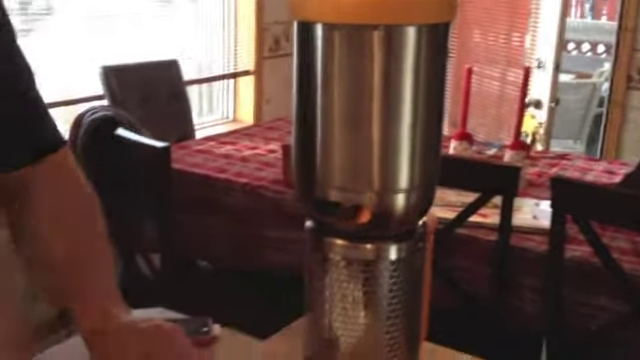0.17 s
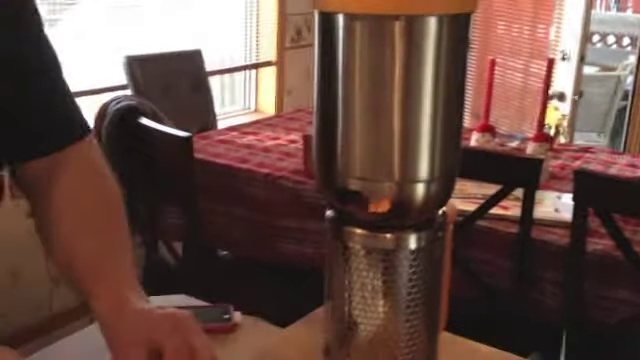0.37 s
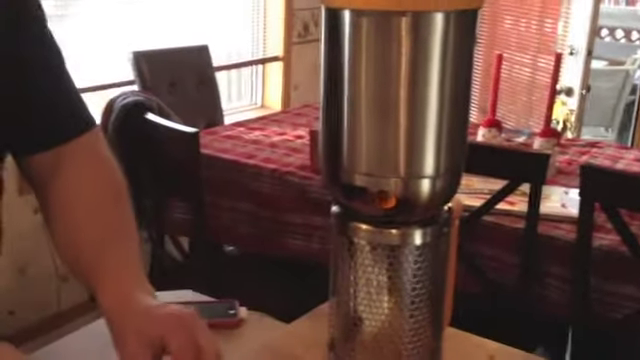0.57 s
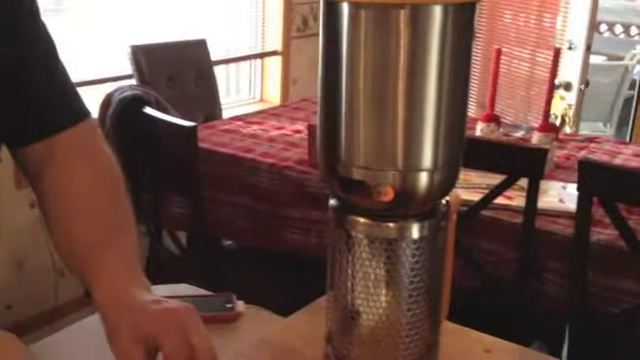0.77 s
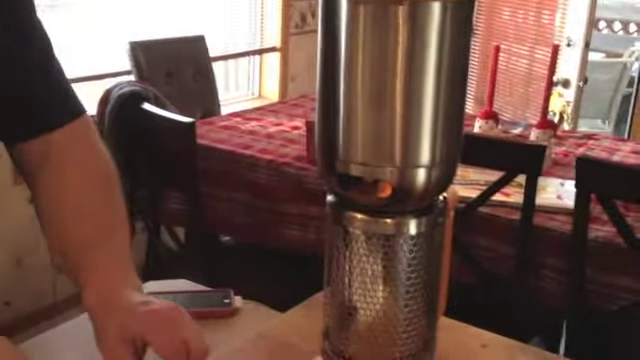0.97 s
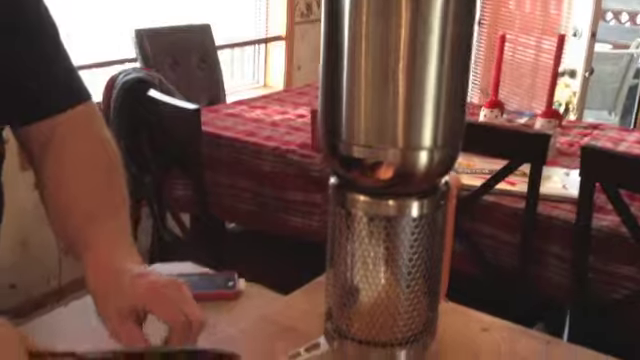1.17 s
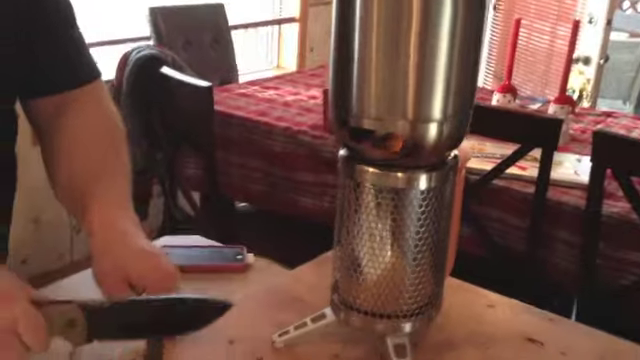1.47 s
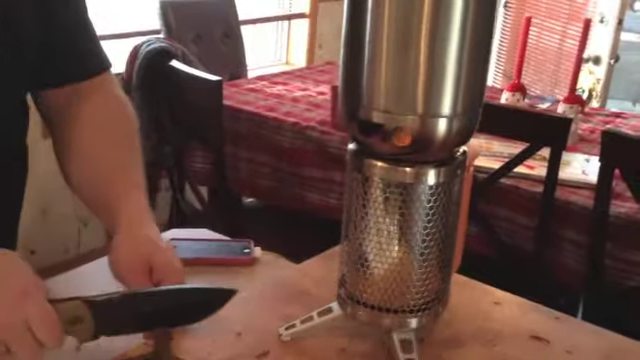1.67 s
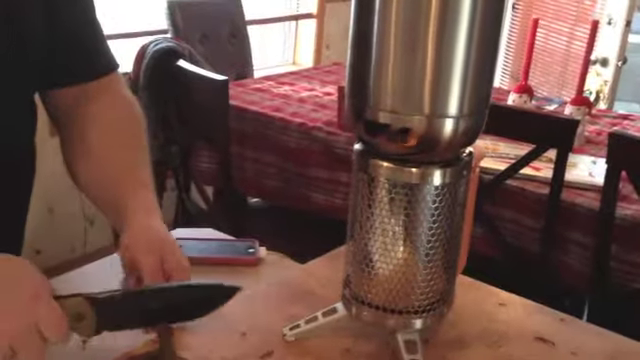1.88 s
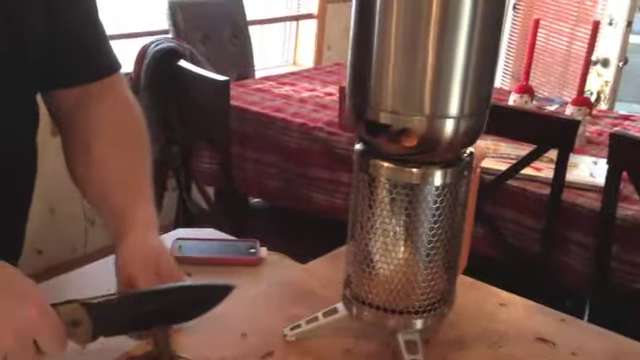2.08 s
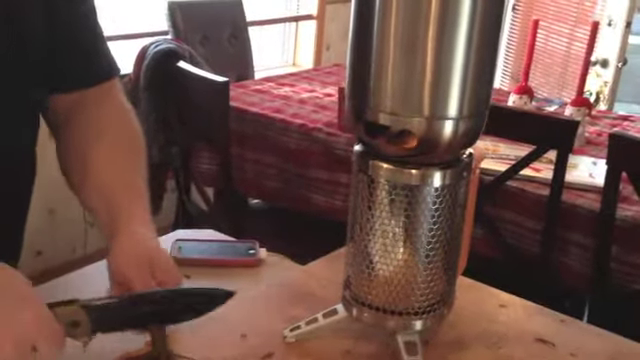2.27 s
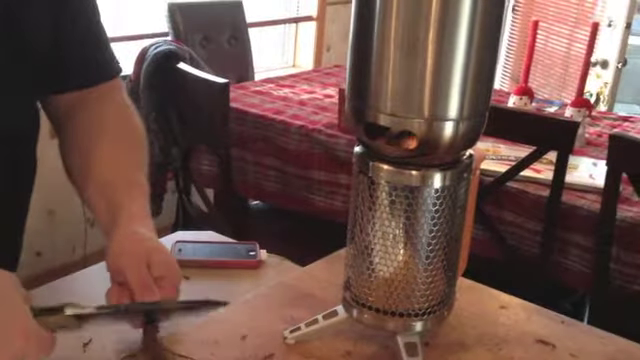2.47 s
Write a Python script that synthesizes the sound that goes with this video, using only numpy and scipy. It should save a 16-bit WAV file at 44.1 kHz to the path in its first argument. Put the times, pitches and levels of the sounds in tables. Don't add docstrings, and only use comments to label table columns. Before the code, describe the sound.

A hard knock strikes a wooden table almost at once, bounces faintly and rings through a small room; a stove fan whirs softly throughout, with faint knife ticks later, heard by a close, slightly overloaded microphone.

```python
import sys
import numpy as np
from scipy import signal
from scipy.io import wavfile
from scipy.ndimage import uniform_filter1d

SR = 44100
rng = np.random.default_rng(int(sys.argv[2]) if len(sys.argv) > 2 else 0)


def transcribe(u):
    v = np.clip(np.atleast_2d(u).T, -1, 1)
    q = np.round(v * 32767).astype(np.int16)
    wavfile.write(sys.argv[1], SR, q)


def invert_db(x):
    u = np.asarray(x, float) / 20
    return 10 ** u


N = 114660

# pitch_hz, level_db (per Hz)
FAN_AIR = [(41, -61), (70, -12.5), (173, -6.5), (500, -4), (547, -3.5), (751, -4.5), (1050, -11),
           (2980, -19.5), (15500, -50)]
# pitch_hz, width_hz, lift_db
HOLLOWS = [(171, 27, 4.5), (263.5, 6.9, 1.5), (352, 39, -10), (455.3, 4, 10), (492.8, 11.2, 4.5),
           (608, 6, -2), (713, 17, -3.5), (770.4, 6.7, 6.5), (1197, 9.8, -7), (1439, 11, -13),
           (1708, 10, 3.5), (4450, 450, -7.5)]
# multiple (of the drive rate), before_db, after_db (around the drive change)
MOTOR_WHINE = [(2, -62, -70), (3, -79, -76), (4, -77, -86)]
# centre_s, half_width_s, level_db
RUSTLES = [
    (0.559, .015, -80),
    (1.345, .03, -70),
    (1.92, .04, -81),
    (2.09, .02, -79),
    (2.505, .03, -67),
]
# start_s, peak_db, pitch_hz,
# scuff_db, thump_db
TICKS = [(0.228, -99, 4000, -99, -36), (0.561, -58, 8500, -55, -74), (1.079, -60, 11500, -80, -90),
         (0.3068, -28.5, 8900, -70, -40), (1.566, -49, 8400, -92, -66), (1.905, -49, 4300, -62, -85),
         (1.934, -52, 4620, -72, -85), (2.088, -57, 7000, -76, -95), (2.489, -60, 9000, -66, -90),
         (2.5002, -53, 7500, -63, -85), (2.5091, -30, 4500, -46.5, -70), (2.522, -51, 4600, -79, -90),
         (2.594, -70, 4000, -85, -54)]
# pitch_hz, level_db (per Hz)
ROOM_TAIL = [(24, -66), (40, -28), (136, 2), (472, -0.5), (797, -3.5), (1160, -8.5), (1380, -9.5),
             (6320, -27), (15500, -61)]
# pitch_hz, t60_s
ROOM_T60 = [(60, 0.14), (160, 0.65), (420, 0.43), (1100, 0.43), (2910, 0.37), (7680, 0.33)]
# start_s, crack_db, table_db
KNOCKS = [
    (0.2250, -2.5, -7),
    (0.3068, -36, -28.5),
]
# pitch_hz, level_db, t60_s
HARD_EDGE = [(2200, -2, .006), (3300, -5, .004), (4600, -3, .004), (7200, -17, .004), (9000, -18, .004),
             (13300, -24, .005)]
# pitch_hz, level_db, t60_s
WOODEN_TOP = [(165.3, -6, 0.37), (201.7, -4, .25), (258.8, -10, 0.46), (292.1, -5, .3), (359, -6.5, .25),
              (435, -2.5, 0.31), (482.5, 0.5, 0.25), (590, -14, 0.36), (747, -13, 0.2), (813, -6.5, 0.19),
              (1024, -12, 0.26), (1199, -8.5, 0.31), (1536, -16.5, 0.28), (2055, -8, 0.14)]
# pitch_hz, level_db, t60_s
THUD = [(136.4, -18.5, 0.18), (203, -5, 0.079), (273.6, -4.5, 0.13), (340, -22, 0.059)]

AIR_DB, AIR_PATCHY_DB, AIR_LOW_CUT_HZ = -43.5, 0.65, 177
DRIVE_HZ, DRIVE_CHANGE_S, WHINE_WOBBLE_DB = 961, 1.545, 2.5
RUSTLE_HZ, MIC_HISS_DB = 8000, -95
BLADE_CYCLES, BLADE_OVERTONE, SNAP_DB, SNAP_S = 22, 1.35, -9, 0.0017
SCUFF_RISE_S, SCUFF_T60_S, SCUFF_LOW_HZ, SCUFF_TOP_HZ = 0.0037, 0.16, 3430, 7000
THUMP_HZ, THUMP_T60_S = 41, 0.058
TAIL_DB, TAIL_RISE_S, TAIL_LOW_HZ = -6.5, 0.0022, 446
BUZZ_DB, BUZZ_S, BUZZ_FADE_S, BUZZ_HZ = -46, 0.13, 0.05, 8050
CRACK_S, CRACK_TOUCHES = 0.0012, 5
TOP_LAG_S, TOP_SPREAD_S, THUD_LAG_S = 0.00073, 0.00303, 0.0011
MIC_LOW_HZ, MIC_TOP_HZ, CLIP = 95, 15400, 0.67
GAIN_KNEE_DB, GAIN_RATIO, GAIN_ATTACK_S, GAIN_RELEASE_S = -35.5, 0.32, 0.026, 0.55


def rms_one(x):
    return x / np.sqrt(np.mean(x ** 2) + 1e-20)


def at_hz(points, hz):
    pitch_hz, value = np.transpose(points)
    return np.interp(np.log(hz), np.log(pitch_hz), value)


def drift(rate_hz):
    r = np.exp(-2 * np.pi * rate_hz * 40 / SR)
    slow = signal.lfilter([1], [1, -2 * r, r * r], rng.standard_normal(N // 40 + 2002))
    slow = rms_one(slow[2000:])
    return np.interp(np.arange(N) / 40, np.arange(len(slow)), slow)


def ring(clicks, hz, t60):
    r, w = invert_db(-60 / (t60 * SR)), 2 * np.pi * hz / SR
    return signal.lfilter([0, np.sin(w)], [1, -2 * r * np.cos(w), r * r], clicks + 1e-18)


def cut(x, hz, kind, order=2):
    return signal.sosfilt(signal.butter(order, hz, kind, fs=SR, output="sos"), x)


def bands():
    edges = 28 * 2 ** np.arange(0, 9.4, 1 / 3)
    white = rng.standard_normal((3, N))
    out = []
    for k, (low, high) in enumerate(zip(edges, edges[1:])):
        out.append((np.sqrt(low * high), cut(white[k % 3], [low, high], "band")))
    return out


def since(start_s):
    t = np.arange(N) / SR - start_s
    return np.maximum(t, 0), t >= 0


def click(start_s, db):
    x = np.zeros(N)
    x[int(start_s * SR)] = invert_db(db)
    return x


def mic_hiss():
    return invert_db(MIC_HISS_DB) * rng.standard_normal(N)


def fan_air():
    together = drift(3.1)
    air = np.zeros(N)
    for hz, band in bands():
        patchy_db = AIR_PATCHY_DB * (0.2 * together + drift(22.5))
        air += invert_db(at_hz(FAN_AIR, hz) + patchy_db) * band
    out = air.copy()
    for hz, width, lift_db in HOLLOWS:
        r = np.exp(-np.pi * width / SR)
        poles = [1, -2 * r * np.cos(2 * np.pi * hz / SR), r * r]
        out += invert_db(lift_db) * signal.lfilter([(1 - r * r) / 2, 0, (r * r - 1) / 2], poles, air)
    return invert_db(AIR_DB) * rms_one(cut(out, AIR_LOW_CUT_HZ, "high"))


def motor_whine():
    t = np.arange(N) / SR
    out = np.zeros(N)
    for multiple, before_db, after_db in MOTOR_WHINE:
        level_db = np.where(t < DRIVE_CHANGE_S, before_db, after_db) + WHINE_WOBBLE_DB * drift(2)
        level = invert_db(uniform_filter1d(level_db, size=200))
        out += level * np.sqrt(2) * np.sin(2 * np.pi * multiple * DRIVE_HZ * t)
    return out


def rustle():
    t = np.arange(N) / SR
    swell = sum(invert_db(db) * np.exp(-0.5 * ((t - s) / width) ** 2) for s, width, db in RUSTLES)
    grain = rms_one(cut(rng.standard_normal(N), RUSTLE_HZ, "high")) * invert_db(2.5 * drift(120))
    return swell * grain


def thumps():
    return sum(ring(click(s, thump_db), THUMP_HZ, THUMP_T60_S) for s, _, _, _, thump_db in TICKS)


def knife():
    hiss = cut(cut(rng.standard_normal(N), SCUFF_LOW_HZ, "high"), SCUFF_TOP_HZ, "low")
    hiss = rms_one(hiss) * invert_db(2.1 * drift(150))
    slips = cut(rng.standard_normal(N), 2800, "high")
    out = np.zeros(N)
    for s, db, hz, scuff_db, _ in TICKS:
        t, on = since(s)
        hit = click(s, db) + click(s + 1 / hz, db + 1.5)
        blade_t60 = BLADE_CYCLES / hz
        out += ring(hit, hz, blade_t60)
        out += 0.76 * ring(hit, min(BLADE_OVERTONE * hz, 14500), blade_t60)
        out += on * (t < SNAP_S) * invert_db(db + SNAP_DB) * slips
        out += (1 - np.exp(-t / SCUFF_RISE_S)) * invert_db(scuff_db - 60 * t / SCUFF_T60_S) * hiss
    return out


def room_tail():
    t, on = since(KNOCKS[0][0])
    parts = [(hz, invert_db(at_hz(ROOM_TAIL, hz)) * band) for hz, band in bands()]
    scale = np.sqrt(np.mean(sum(part for _, part in parts) ** 2))
    wash = sum(part * invert_db(-60 * t / at_hz(ROOM_T60, hz)) for hz, part in parts) / scale
    wash = cut(wash, TAIL_LOW_HZ, "high", order=1)
    buzz = rms_one(cut(rng.standard_normal(N), BUZZ_HZ, "high")) * invert_db(1.6 * drift(54))
    hold = invert_db(BUZZ_DB - 60 * t - 20 * np.maximum(t - BUZZ_S, 0) / BUZZ_FADE_S)
    return on * (1 - np.exp(-t / TAIL_RISE_S)) * (invert_db(TAIL_DB) * wash + hold * buzz)


def thud():
    out = np.zeros(N)
    for k, (hz, db, t60) in enumerate(THUD):
        out += (-1) ** k * ring(click(KNOCKS[0][0] + THUD_LAG_S, db), hz, t60)
    return out


def wooden_top(start_s, table_db):
    out = np.zeros(N)
    for hz, db, t60 in WOODEN_TOP:
        lag, sign = rng.random(2)
        hit = click(start_s + TOP_LAG_S + TOP_SPREAD_S * lag, table_db + db)
        out += ring(hit, hz, t60) * np.sign(sign - 0.5)
    return out


def crack(start_s, crack_db):
    out = np.zeros(N)
    for hz, db, t60 in HARD_EDGE:
        touches = np.zeros(N)
        for k, size in enumerate(rng.uniform(-1.39, 1, CRACK_TOUCHES)):
            touches += size * click(start_s + CRACK_S * k / CRACK_TOUCHES, crack_db + db)
        out += ring(touches, hz, t60)
    return out


def knocks():
    wood = sum(wooden_top(s, table_db) for s, _, table_db in KNOCKS)
    cracks = sum(crack(s, crack_db) for s, crack_db, _ in KNOCKS)
    return thud() + wood + cracks


def scene():
    fan = fan_air() + motor_whine()
    hits = cut(knocks() + room_tail() + knife(), MIC_LOW_HZ, "high", order=4)
    return (fan + hits + thumps() + rustle() + mic_hiss())[None]


def top_cut(x):
    return signal.sosfilt(signal.butter(12, 16850, fs=SR, output="sos"), x)


def record(dry):
    t = np.arange(N) / SR
    level_db = 10 * np.log10(uniform_filter1d(dry[0] ** 2, size=441) + 1e-12)
    duck_db = GAIN_RATIO * np.maximum(level_db - GAIN_KNEE_DB, 1e-3)
    held = np.maximum.accumulate(np.log(duck_db) + t / GAIN_RELEASE_S)
    duck_db = np.exp(held - t / GAIN_RELEASE_S)
    r = np.exp(-1 / (GAIN_ATTACK_S * SR))
    x = dry * invert_db(-signal.lfilter([1 - r], [1, -r], duck_db))
    clipped = CLIP * x / (CLIP ** 4 + x ** 4) ** (1 / 4)
    top = signal.ellip(12, 1, 45, MIC_TOP_HZ, fs=SR, output="sos")
    return top_cut(signal.sosfilt(top, clipped))


dry = scene()
out = record(dry)
transcribe(out)
```